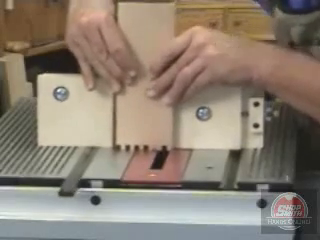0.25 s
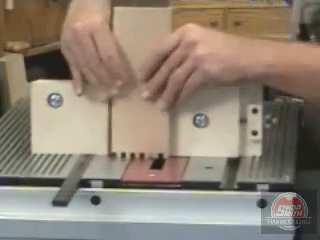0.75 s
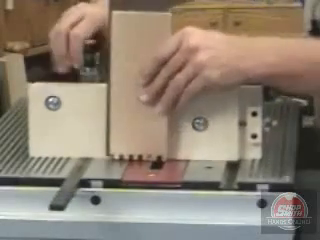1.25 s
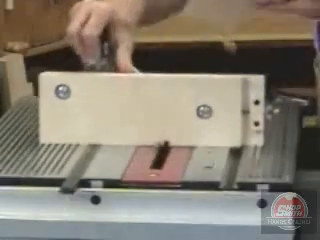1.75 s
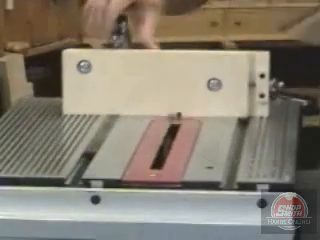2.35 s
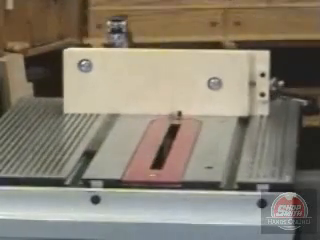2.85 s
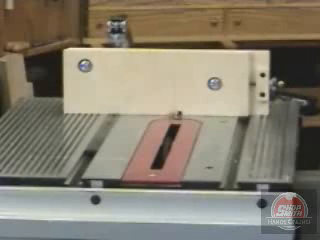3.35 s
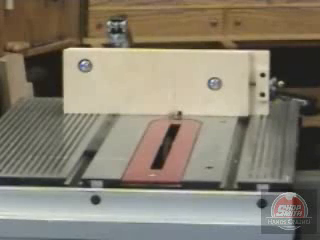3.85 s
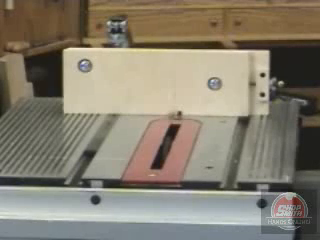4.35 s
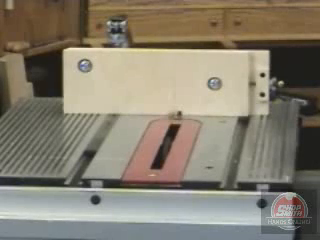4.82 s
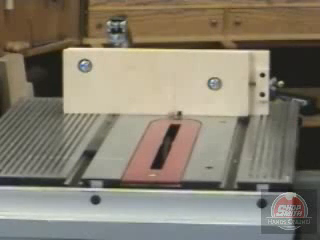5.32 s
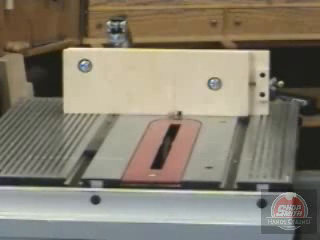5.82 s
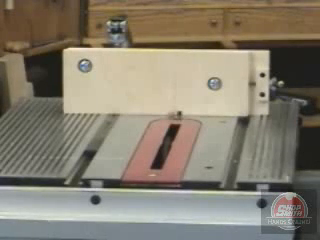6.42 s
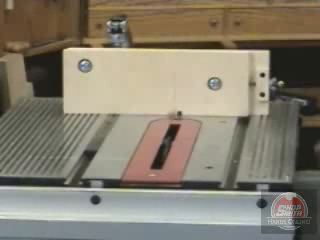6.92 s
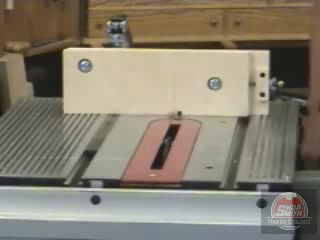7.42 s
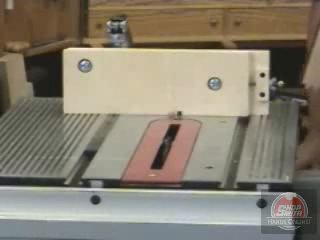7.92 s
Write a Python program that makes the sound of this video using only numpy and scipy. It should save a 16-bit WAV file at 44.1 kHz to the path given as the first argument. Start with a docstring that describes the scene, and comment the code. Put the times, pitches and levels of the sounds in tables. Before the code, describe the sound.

A table saw rasps out of wood, runs free and coasts down, its whine sinking while a dust collector keeps humming.

```python
"""In a workshop, a table saw grazes out of a wood cut, runs free, is switched off and coasts down.
The teeth rasp in the kerf and hiss past the jig, which knocks and rumbles as it is drawn back.
The blade whines and churns the air; its whine sinks and its rush dulls with the speed.
The slackening belt whirrs, the coasting drive gives short, squeaky rasps, and the treble shimmers.
Behind it all another machine, probably a dust collector, keeps humming and drawing air."""
import sys
import numpy as np
from scipy import signal
from scipy.fft import rfft, irfft, next_fast_len
from scipy.io import wavfile
from scipy.ndimage import uniform_filter1d

SR = 44100
rng = np.random.default_rng(int(sys.argv[2]) if len(sys.argv) > 2 else 0)


def put_to_file(sound):
    """Save the sound as 16-bit audio at rate SR, in the file named by the first command-line argument."""
    columns = np.atleast_2d(sound).T  # one column per channel
    safe = np.clip(columns, -1, 1)
    whole_steps = np.round(safe * 32767)
    wavfile.write(sys.argv[1], SR, whole_steps.astype(np.int16))


N = 360297
T = np.arange(N) / SR
FRAME_T = np.arange(N // 256 + 5) * 256 / SR
BIN_HZ = np.fft.rfftfreq(1024, 1 / SR)

MOTOR_HZ, FULL_SPEED_HZ = 59.2, 97  # turns per second: collector motor, saw shaft
CUT_END_S, JIG_NEAR_S, JIG_CLEAR_S, POWER_OFF_S = 0.76, 0.56, 2.37, 3.17

# Tone colours. Each row: frequency in Hz, relative spectral level in dB.
SUCTION_COLOUR = [(25, -42), (70, -35.5), (150, -9.5), (260, -6), (370, 0.5), (480, 1), (640, 0), (770, -4),
                  (1050, -5.5), (1450, -8), (2000, -15.5), (2700, -33), (3500, -57), (4400, -45),
                  (5200, -42.5), (6100, -51.5), (7200, -53), (9800, -63)]  # air drawn into the collector
RUMBLE_COLOUR = [(15, -16.5), (40, -3), (65, -0.5), (95, 8.5), (160, -23.5), (500, -75.5)]  # machines and table shaking
RUSTLE_COLOUR = [(2500, -29.5), (4500, -4.5), (5400, 3), (6300, 9.5), (7200, -14), (9800, -8)]  # light treble above the rush
SHIMMER_COLOUR = [(1300, -26), (1900, 8), (2700, 6), (3400, 4), (4400, -4.5), (5500, -1.5), (6200, -17),
                  (7000, -45.5)]  # fluttering treble shimmer
DRIVE_COLOUR = [(900, -27.5), (2000, 4.5), (2650, 8), (3100, 3.5), (3600, -6.5), (4400, -6.5), (5400, -23),
                (6300, -17), (7200, -27.5), (9800, -46)]  # belt and bearings
RASP_COLOUR = [(1200, -53.5), (2250, 4), (2600, 2.5), (2880, 8), (3050, -2.5), (3250, -25), (3800, -37),
               (5000, -38), (6500, -70)]  # a rub in the drive, at its usual pitch
GAP_COLOUR = [(90, -40), (300, -15), (700, 8), (1100, -6), (2400, 1), (3400, 3.5), (4300, -.5),
              (5400, -1.5), (6100, -7.5), (7000, -25), (11000, -32)]  # air squeezed between blade and jig
BARE_TEETH_COLOUR = [(90, -49.5), (400, -17.5), (800, -3), (1000, -5.5), (1400, -1), (1750, 0),
                     (2200, -32.5), (3000, -43), (6000, -58.5)]  # eddies off the exposed teeth at full speed
BLADE_AIR_COLOUR = [(50, -60.5), (95, -24.5), (160, -6), (330, -7.5), (560, -1.5), (760, 3.5), (900, 1),
                    (1100, 1.5), (1400, -1), (1800, -5), (2500, -10.5), (3400, -25), (4400, -39.5),
                    (5400, -43), (6300, -41.5), (7000, -81), (9400, -47)]  # air thrown by the teeth at full speed
BITE_COLOUR = [(300, -14), (900, 3), (1700, 0), (2600, 5), (3400, -3), (4300, -4), (4900, -33), (5800, -15),
               (6600, -45), (8000, -57)]  # teeth catching the wood
CUT_COLOUR = [(70, -54), (150, -23.5), (400, 1.5), (900, 2.5), (1500, 3), (2300, 0.5), (3000, -11.5),
              (4300, -25), (6000, -25), (7000, -50.5)]  # teeth grazing the wood

# Movement in the suction. Each row: frequency in Hz, depth in dB.
SUCTION_EDDIES = [(1500, 1), (2600, 3.6), (4500, 3.6), (7000, 1.5)]
SUCTION_FLICKER = [(2000, 0), (4000, 1.5)]

# Fader rides. Each row: time in seconds, relative level in dB.
IMPELLER_RIDE = [(0, -34), (0.27, -34), (0.5, -28), (0.87, -39), (1.15, -29), (1.7, -35), (2.13, -27),
                 (2.33, -34), (2.58, -28), (3.2, -31.5), (3.48, -37), (3.68, -30), (4.7, -30.5),
                 (5.4, -29.5), (5.67, -32), (5.95, -28.5), (6.8, -30.5), (6.95, -29), (8.1, -27.5)]  # the impeller's tone
DRONE_RIDE = [(0.0, -30), (0.95, -29.5), (1.22, -17.5), (1.5, -26), (2.0, -25.5), (4.1, -21), (4.85, -20),
              (5.15, -26), (5.55, -27), (5.68, -16.5), (5.95, -24), (6.15, -17.5), (6.3, -23.5),
              (6.52, -39), (6.6, -20), (6.9, -26), (7.1, -27), (8.0, -35.5)]  # the hollow drone
SONG_RIDE = [(0, -34), (1.8, -34), (2.4, -31), (3.1, -27), (3.3, -28.5), (3.55, -31), (3.9, -34.5),
             (4.5, -43), (6.0, -60)]  # the blade's main whine

# Resonances of hose, table and cabinet. Each row: centre in Hz, width in Hz, boost in dB.
CABINET_RESONANCES = [(375, 25, 8.5), (526, 49, 4.5), (640, 40, 2), (825, 110, -1), (1090, 27, 4.5),
                      (1450, 30, -1), (2070, 37, 0.5), (2630, 18, 5.5), (3220, 70, -1), (3620, 36, 11),
                      (3930, 34, 6), (5430, 140, 14.5)]
# Ringing sheet metal. Each row: centre in Hz, width in Hz, level in dB.
PANEL_MODES = [(651, 29, -45.5), (941, 22, -44), (1041, 31, -40), (1490, 15, -49)]
# Harmonics of the collector's motor. Each row: frequency in Hz, level in dB.
MOTOR_HARMONICS = [(118.4, -40), (177.6, -40), (296, -42.5), (414.4, -42), (592, -39.5), (947.2, -47.5)]
# Tones of the spinning blade. Each row: multiple of the shaft speed, base level in dB.
WHINE_HARMONICS = [(3, -38), (6, -42.5), (14, -40.5), (24, -43)]
# Ring of the wooden jig. Each row: frequency in Hz, relative level in dB, seconds to fall 60 dB.
JIG_MODES = [(538, -6, .045), (800, -1, 0.03), (1040, -9, .015), (1400, -14, .02)]

# Soft low bumps. Each row: start in seconds, relative level in dB.
THUMP_CUES = [(0.948, -35), (1.119, -41), (1.218, -39), (1.493, -34), (1.825, -40), (2.105, -40),
              (2.557, -38), (2.685, -39), (2.845, -36), (3.674, -39), (3.822, -34), (4.116, -38),
              (4.286, -38)]
# Shoves of the jig. Each row: start in seconds, length in seconds, level in dB.
SHOVE_CUES = [(0, 0.071, -30.5), (1.206, 0.44, -40.5), (2.007, 0.2, -39)]
# Knocks of the jig. Each row: start in seconds, relative level in dB.
KNOCK_CUES = [(1.957, -6), (1.974, -12), (2.6, -14)]
# Hiss flares as the jig sways near the teeth. Each row: peak in seconds, length in seconds, boost in dB.
FLARE_CUES = [(1.6, .06, 4), (1.8, .04, 4), (2.056, .04, 9)]
# Rasps of the drive. Each row: start in seconds, relative level in dB, length in seconds, pitch in Hz.
RASP_CUES = [(3.45, -32, 0.061, 3600), (4.288, -33, .05, 3600), (4.478, -37, 0.036, 3700),
             (4.729, -26.5, 0.061, 2900), (4.78, -28, 0.031, 2990), (4.806, -29, 0.046, 2880),
             (4.868, -30, 0.018, 3000), (4.924, -25, 0.022, 2880), (4.982, -31, 0.027, 2860),
             (5.184, -31, 0.044, 2820), (5.269, -28.5, 0.034, 2620), (5.31, -30, 0.038, 2960),
             (5.352, -32, 0.039, 3050), (5.411, -29, 0.012, 2960), (5.454, -39, 0.05, 2880),
             (5.572, -34, 0.022, 2810), (5.626, -36, 0.036, 2940), (5.769, -41, .02, 2850),
             (6.056, -39, 0.025, 2880), (6.097, -40, .02, 2900), (6.162, -34.5, 0.032, 2870),
             (6.208, -37, .025, 2840), (6.545, -40.5, .025, 2960), (6.724, -41, .025, 2590)]


def gain_of(db):
    """Decibels to a gain."""
    return 10 ** (np.asarray(db) / 20)


def unit_rms(x):
    """Scales to an rms of one."""
    return x / np.sqrt(np.mean(x ** 2) + 1e-20)


def since(s, t=T):
    """Seconds gone by since a moment; zero before it."""
    return np.maximum(t - s, 0)


def ramp(s, length_s):
    """A fade from 0 to 1, centred on a moment."""
    return np.clip((T - s) / length_s + .5, 0, 1)


def ride_db(points):
    """Plays back a fader ride."""
    return np.interp(T, *np.transpose(points))


def curve_db(points, hz):
    """Reads a curve on a log-frequency axis."""
    f, db = np.transpose(points)
    return np.interp(np.log(hz + 1), np.log(f + 1), db)


def wander(rate_hz):
    """Smooth random drift, rms one."""
    size = next_fast_len(N, True)
    hz = np.fft.rfftfreq(size, 1 / SR)
    spectrum = rfft(rng.standard_normal(size)) / (1 + (hz / rate_hz) ** 4)
    return unit_rms(irfft(spectrum, size)[:N])


def resonance(centre_hz, width_hz):
    """Noise in one narrow band, steady or gliding, rms one."""
    angle = 2 * np.pi * np.cumsum(centre_hz * np.ones(N)) / SR
    return unit_rms(wander(width_hz / 2) * np.cos(angle) + wander(width_hz / 2) * np.sin(angle))


def turbulence(colour_db, patchy_db):
    """Coloured noise with eddies as patches in time and frequency, rms one."""
    real, imag, eddies = rng.standard_normal((3, len(FRAME_T), len(BIN_HZ)))
    eddies = unit_rms(uniform_filter1d(uniform_filter1d(eddies, size=10, axis=0), size=4, axis=1))
    eddies = 2 * np.tanh(eddies / 2)  # no single eddy stands out as a chirp
    colour = gain_of(colour_db)
    colour = colour / np.linalg.norm(colour, axis=-1, keepdims=True)
    frames = (real + 1j * imag) * colour * gain_of(patchy_db * eddies)
    return unit_rms(signal.istft(frames.T, nperseg=1024, noverlap=768)[1][:N])


def cabinet_db():
    """The EQ that hose, table and cabinet put on moving air."""
    return sum(db / (1 + (2 * (BIN_HZ - hz) / width) ** 2) for hz, width, db in CABINET_RESONANCES)


def speed_share(t=T, drag_s=0.8, drag_power=0.38):
    """Shaft speed as a share of full speed; with the power off, drag brakes it hardest at first."""
    return (1 + since(POWER_OFF_S, t) / drag_s) ** -drag_power


def shaft_angle():
    """Angle of the saw shaft in radians."""
    return 2 * np.pi * np.cumsum(FULL_SPEED_HZ * speed_share()) / SR


def turn_pulse(depth):
    """Tremolo that peaks once per turn of the shaft."""
    return 1 + depth * np.cos(shaft_angle())


def jig_closeness(rise_s=0.48, clear_s=0.035):
    """How close the jig is to the blade, 0-1."""
    return ramp(JIG_NEAR_S, rise_s) * (1 - ramp(JIG_CLEAR_S, clear_s))


def uncovered(fade_s=0.047):
    """How far the jig has left the blade, 0-1."""
    return ramp(JIG_CLEAR_S, fade_s)


def belt_slack(rise_s=0.44, fade_db_per_s=7.5):
    """How loosely the belt runs once the power is off, 0-1."""
    swell = np.minimum(since(POWER_OFF_S) / rise_s, 1)
    return swell * gain_of(-fade_db_per_s * since(POWER_OFF_S + rise_s))


def workshop_echoes(sound, count=32, t60_s=.35, wet_db=-14):
    """Bench and cabinets send back weak early echoes that comb the sound."""
    delay_s = rng.uniform(.004, .07, count)
    taps = np.zeros(SR // 10)
    taps[(delay_s * SR).astype(int)] = rng.choice([-1., 1.], count) * gain_of(-60 * delay_s / t60_s)
    taps *= gain_of(wet_db) / np.linalg.norm(taps)
    taps[0] = 1  # direct sound
    return signal.oaconvolve(sound, taps / np.linalg.norm(taps))[:N]


def suction(level_db=-23, ease_s=4.7, ease_db_per_s=0.54):
    """A bed of air rushing into the collector, even in the bass, restless on top; it eases late on."""
    flicker = np.interp(FRAME_T, T, wander(rate_hz=12))[:, None]
    flicker_db = flicker * curve_db(SUCTION_FLICKER, BIN_HZ)
    colour_db = curve_db(SUCTION_COLOUR, BIN_HZ) + cabinet_db() + flicker_db
    rush = turbulence(colour_db, patchy_db=curve_db(SUCTION_EDDIES, BIN_HZ))
    return rush * gain_of(level_db - ease_db_per_s * since(ease_s))


def collector_hum(waver_db=2.5, drift=0.0012, unsteady_db=1):
    """The collector's motor and impeller waver; the impeller's tone steadies as the saw slows."""
    clock = np.cumsum(1 + drift * wander(rate_hz=3.5)) / SR
    motor = np.zeros(N)
    for hz, db in MOTOR_HARMONICS:
        strength = gain_of(db + waver_db * wander(rate_hz=6.7))
        motor += strength * np.sin(2 * np.pi * (hz * clock + rng.random()))
    vanes = np.sin(2 * np.pi * 4 * MOTOR_HZ * clock)
    vanes_db = ride_db(IMPELLER_RIDE) + unsteady_db * speed_share() * wander(rate_hz=5.1)
    return np.sqrt(2) * (motor + gain_of(vanes_db) * vanes)


def hollow_drone(running_hz=522, resting_hz=468, width_hz=60, rush_db=-9, tone_db=-7):
    """A hollow resonance swells, sinks and flutters, fed by airflow and the motor's eighth harmonic."""
    flutter = 1 + .27 * wander(rate_hz=16)
    tone = np.sqrt(2) * flutter * np.sin(2 * np.pi * 8 * MOTOR_HZ * T + .5 * wander(rate_hz=8))
    rush = resonance(resting_hz + (running_hz - resting_hz) * speed_share(), width_hz)
    return (gain_of(rush_db) * rush + gain_of(tone_db) * tone) * gain_of(ride_db(DRONE_RIDE))


def rumble(shake_db=-44, tone_db=-47, duck_db=-14, settle_s=4.27, flutter_db=3):
    """Low end around the motor's lowest tone: weak and fitful at first, steady once the saw has slowed."""
    shake = gain_of(shake_db) * turbulence(curve_db(RUMBLE_COLOUR, BIN_HZ), patchy_db=-0.5)
    tone = gain_of(tone_db) * np.sqrt(2) * np.sin(2 * np.pi * MOTOR_HZ * T)
    fitful = 1 - ramp(settle_s, length_s=0.6)
    return (shake + tone) * gain_of(fitful * (duck_db + flutter_db * wander(rate_hz=5.5)))


def panels():
    """Sheet-metal panels ring faintly in the airflow."""
    return sum(gain_of(db) * resonance(hz, width) for hz, width, db in PANEL_MODES)


def rustle(level_db=-61, fade_db_per_s=1.8):
    """A light, fitful treble rustle that thins out as the saw slows."""
    fits_db = 3 * wander(rate_hz=12)
    noise = turbulence(curve_db(RUSTLE_COLOUR, BIN_HZ), patchy_db=2)
    return noise * gain_of(level_db + fits_db - fade_db_per_s * since(POWER_OFF_S))


def treble_shimmer(low_hz=1750, high_hz=6100, count=46, flutter_db=8, blur_hz=16):
    """A fluttering shimmer of many close, narrow tones, loudest with the jig near or the belt slack."""
    shimmer = np.zeros(N)
    for hz in low_hz + (high_hz - low_hz) * (np.arange(count) + rng.random(count)) / count:
        swell, drift = unit_rms(uniform_filter1d(rng.standard_normal((2, len(FRAME_T))), size=6, axis=1))
        strength = gain_of(curve_db(SHIMMER_COLOUR, hz) + flutter_db * 2 * np.tanh(swell / 2))
        angle = 2 * np.pi * np.cumsum(hz + blur_hz * drift) * FRAME_T[1]
        shimmer += np.interp(T, FRAME_T, strength) * np.sin(np.interp(T, FRAME_T, angle))
    running = gain_of(-36.5) * speed_share() ** 4
    jig_near = gain_of(-32.5) * jig_closeness()
    slack = gain_of(-33.5) * belt_slack() ** 2
    coasting = gain_of(-43) * speed_share()
    envelope = np.sqrt(running ** 2 + jig_near ** 2 + slack ** 2 + coasting ** 2)
    surge_db = wander(rate_hz=14)
    return unit_rms(shimmer * turn_pulse(depth=.1)) * envelope * gain_of(surge_db)


def thumps(centre_hz=55, length_s=0.079, trim_db=-1):
    """Soft low bumps, a few cycles each."""
    out, age = np.zeros(N), np.arange(0, length_s, 1 / SR)
    envelope = np.sin(np.pi * np.sqrt(age / length_s)) ** 2
    for s, db in THUMP_CUES:
        detune, phase = rng.random(2)
        swing = np.sin(2 * np.pi * (centre_hz * (.85 + .3 * detune) * age + phase))
        out[round(s * SR):][:len(age)] += gain_of(db + trim_db) * envelope * swing
    return np.sqrt(2) * out


def tick(at_s=6.7963, width_s=.00009, level_db=-36, pitch_hz=7800):
    """One tiny bright tick."""
    age = T - at_s
    return gain_of(level_db) * np.exp(-(age / width_s) ** 2) * np.cos(2 * np.pi * pitch_hz * age)


def jig_shoves(edge_s=0.034):
    """The jig rumbles on the table while it is handled."""
    push = sum(gain_of(db) * ramp(s, edge_s) * (1 - ramp(s + length, edge_s))
               for s, length, db in SHOVE_CUES)
    return push * turbulence(curve_db(RUMBLE_COLOUR, BIN_HZ), patchy_db=6)


def jig_knocks(rise_s=0.0012):
    """The wooden jig knocks and rings briefly as it is drawn back."""
    out = np.zeros(N)
    for s, knock_db in KNOCK_CUES:
        age = since(s)
        attack = 1 - np.exp(-age / rise_s)
        for hz, mode_db, t60 in JIG_MODES:
            out += attack * gain_of(knock_db + mode_db - 60 * age / t60) * np.sin(2 * np.pi * hz * age)
    return out


def drive_whirr(running_db=-46, slack_db=-29.5):
    """Belt and bearings whirr in surges, pulsing with each turn, loudest when the belt goes slack."""
    whirr = turbulence(curve_db(DRIVE_COLOUR, BIN_HZ) + .5 * cabinet_db(), patchy_db=4.8)
    surge_db = 1.4 * speed_share() * wander(rate_hz=9)
    strength = np.hypot(gain_of(running_db) * speed_share(), gain_of(slack_db) * belt_slack())
    return whirr * turn_pulse(depth=0.064) * strength * gain_of(surge_db)


def drive_chatter(level_db=-53, start_s=3.4, fade_db_per_s=3.5):
    """The rubbing part of the drive chatters faintly as the saw coasts."""
    fits_db = 5 * np.tanh(wander(rate_hz=22))
    rub = resonance(centre_hz=2880, width_hz=170) * ramp(start_s, length_s=.2)
    return rub * gain_of(level_db + fits_db - fade_db_per_s * since(start_s))


def drive_rasps(trim_db=-2, rise_s=0.0015, usual_hz=2880, squeal=.9, waver=.025):
    """The coasting drive rubs in short squeaks: a rough ring around an unsteady pitch."""
    out, age = np.zeros(N), np.arange(SR // 4) / SR
    hz = np.fft.rfftfreq(len(age), 1 / SR)
    for s, db, length, pitch in RASP_CUES:
        friction, slip = rng.standard_normal((2, len(age)))
        colour = gain_of(curve_db(RASP_COLOUR, hz * usual_hz / pitch))
        ring = unit_rms(irfft(rfft(friction) * colour, len(age)))
        squeal_hz = pitch * (1 + waver * unit_rms(uniform_filter1d(slip, size=130)))
        tone = np.sqrt(2) * np.sin(2 * np.pi * np.cumsum(squeal_hz) / SR)
        grip = (1 - np.exp(-age / rise_s)) * np.exp(-(age / length) ** 4)
        out[round(s * SR):][:len(age)] += gain_of(db + trim_db) * grip * unit_rms(ring + squeal * tone)
    return out


def gap_hiss(level_db=-36.5):
    """Air hisses unevenly between teeth and jig until the jig is drawn clear."""
    hiss = turbulence(curve_db(GAP_COLOUR, BIN_HZ) + .5 * cabinet_db(), patchy_db=4)
    surge_db = 1.1 * wander(rate_hz=14)
    flare_db = sum(db * np.exp(-(2 * (T - s) / length) ** 2) for s, length, db in FLARE_CUES)
    return hiss * jig_closeness() * gain_of(level_db + surge_db + flare_db)


def slot_roar(level_db=-28.5, fade_db_per_s=9, running_hz=1680):
    """The uncovered slot roars brightly and fades; its pitch sinks with the speed."""
    roar = resonance(running_hz * speed_share(), width_hz=320)
    return roar * uncovered() * gain_of(level_db - fade_db_per_s * since(JIG_CLEAR_S))


def bare_teeth(level_db=-27):
    """The exposed teeth shed eddies, which drop in pitch and fade fast as the blade slows."""
    shift = speed_share(FRAME_T)[:, None]
    rush = turbulence(curve_db(BARE_TEETH_COLOUR, BIN_HZ / shift), patchy_db=-3)
    return rush * uncovered() * speed_share() ** 5 * gain_of(level_db)


def blade_air(dulling=0.2, level_db=-18, fade_db=180, steepness=2.92):
    """The teeth churn the air; the rush gets weaker and darker as they slow."""
    shift = speed_share(FRAME_T)[:, None] ** dulling
    rush = turbulence(curve_db(BLADE_AIR_COLOUR, BIN_HZ / shift) + cabinet_db(), patchy_db=2.5)
    return rush * gain_of(level_db - fade_db * (1 - speed_share()) ** steepness)


def blade_whine(steepness=3.6, waver_db=2, jitter_rad=0.064, shade_db=5, shade_above_hz=500):
    """The blade whines at multiples of the shaft speed, which slide down and fade with the power off."""
    angle = shaft_angle() + jitter_rad * wander(rate_hz=44)
    tones = np.zeros(N)
    for multiple, db in WHINE_HARMONICS:
        # the jig shades the high tones and radiates the low ones
        tilt = np.tanh(2 * np.log(multiple * FULL_SPEED_HZ / shade_above_hz)) * (uncovered() - .5)
        strength = gain_of(db + shade_db * tilt + waver_db * wander(rate_hz=1.5))
        tones += strength * np.sin(multiple * angle + rng.uniform(0, 2 * np.pi))
    return np.sqrt(2) * tones * speed_share() ** steepness


def blade_song(multiple=12, fuzz=.3, dissolve_s=.7, waver_db=1):
    """The blade's main whine, a fuzzy tone, sinks and dissolves into a whirr once the power is off."""
    angle = multiple * shaft_angle()
    tone = np.sqrt(2) * (np.sin(angle) + fuzz * wander(rate_hz=14) * np.cos(angle))
    whirr = resonance(multiple * FULL_SPEED_HZ * speed_share(), width_hz=130)
    crossfade = np.minimum(since(POWER_OFF_S) / dissolve_s, 1)
    song = np.sqrt(1 - crossfade) * tone + np.sqrt(crossfade) * whirr
    return song * gain_of(ride_db(SONG_RIDE) + waver_db * wander(rate_hz=6.1))


def load_tone(loaded_db=-29.5, free_db=-35, rise_s=.3, ease_db_per_s=7):
    """Under load the saw drones at four times its shaft speed; the tone eases once the wood is free."""
    load = gain_of(loaded_db - ease_db_per_s * since(CUT_END_S)) * np.minimum(T / rise_s, 1)
    strength = np.maximum(load, gain_of(free_db)) * speed_share() ** 4 * gain_of(wander(rate_hz=2.2))
    return np.sqrt(2) * strength * np.sin(4 * shaft_angle())


def bite(level_db=-22.5, peak_s=0.15, width_s=0.08):
    """The teeth catch the side of the kerf once a turn: a short, bright rasp."""
    rasp = turbulence(curve_db(BITE_COLOUR, BIN_HZ), patchy_db=4.5) * turn_pulse(depth=0.5)
    envelope = np.exp(-((T - peak_s) / width_s) ** 4)
    return unit_rms(rasp) * envelope * gain_of(level_db)


def cut(start_db=-17, ease_db_per_s=8.5, release_db_per_s=88):
    """The blade brushes the kerf, hardest once a turn, ever more lightly until the wood comes free."""
    graze = turbulence(curve_db(CUT_COLOUR, BIN_HZ), patchy_db=4) * turn_pulse(depth=0.1)
    level_db = start_db - ease_db_per_s * T - release_db_per_s * since(CUT_END_S)
    return unit_rms(graze) * gain_of(level_db)


def scene():
    """Saw and collector in one mono mix; the treble layers surge together."""
    surge = gain_of(1.6 * wander(rate_hz=20))
    rush = blade_air() + bare_teeth() + slot_roar() + cut()
    rush += surge * (gap_hiss() + drive_whirr()) + suction() + bite()
    saw_tones = blade_whine() + blade_song() + load_tone()
    bed = collector_hum() + hollow_drone() + panels() + rumble()
    top_end = surge * (treble_shimmer() + drive_chatter() + rustle()) + drive_rasps()
    mix = workshop_echoes(rush) + saw_tones + bed + top_end
    return (mix + jig_shoves() + thumps() + jig_knocks() + tick())[None]


def record(dry, cutoff_hz=10300):
    """Tiny fades at both ends and a steep low-pass on the top."""
    faded = dry * signal.windows.tukey(N, .001)
    low_pass = signal.firwin(255, cutoff_hz, window=("kaiser", 9), fs=SR)
    return signal.oaconvolve(faded, low_pass[None], "same")


dry = scene()
out = record(dry)
put_to_file(out)
```